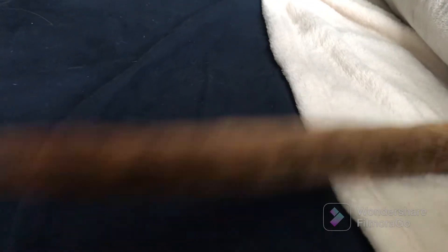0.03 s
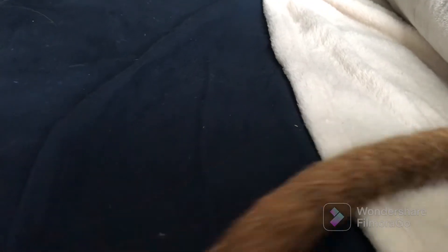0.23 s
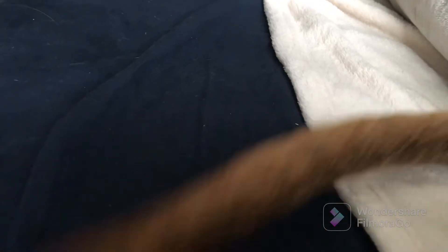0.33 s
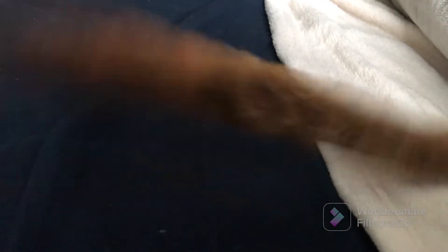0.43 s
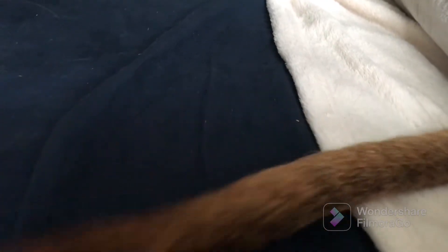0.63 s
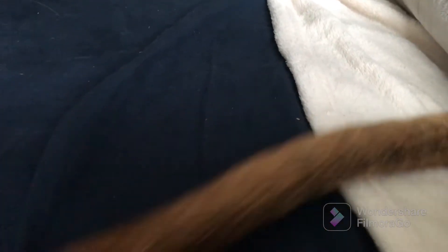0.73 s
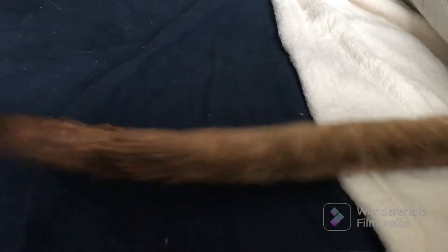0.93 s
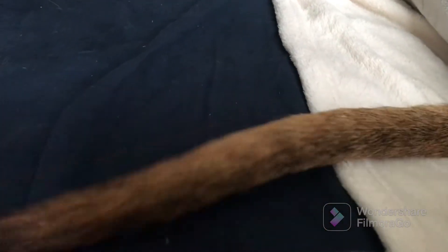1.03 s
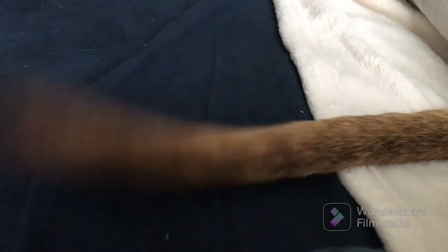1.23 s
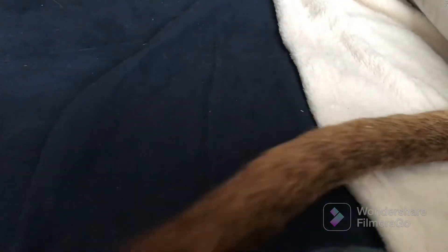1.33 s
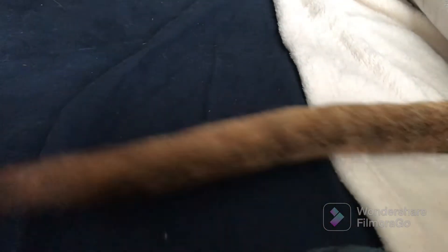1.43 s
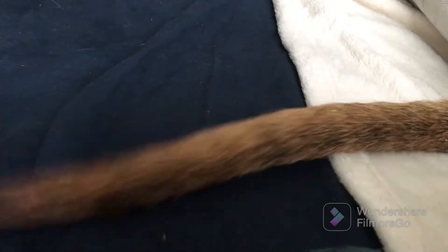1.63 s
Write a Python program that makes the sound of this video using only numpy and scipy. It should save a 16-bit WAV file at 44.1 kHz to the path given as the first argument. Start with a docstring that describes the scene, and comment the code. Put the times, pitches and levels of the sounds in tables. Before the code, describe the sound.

A dog's wagging tail lands on soft bedding in five quick, low thuds, each with a light brush of fur. The last wags only graze the cloth. The microphone is close, in a quiet room with faint hiss.

```python
"""A quiet room, the microphone close to a dog on soft bedding; low rumble and hiss lie under it all.
From 0.2 s the wagging tail lands five times, about 0.2 s apart. Each blow is a low thud that drops
in pitch as the padding gives, with a pat of the cover and a brush of fur; three also knock dully.
After the fifth blow the last wags only graze the cloth, among soft rubs and faint high squeaks."""
import sys
import numpy as np
from scipy import signal
from scipy.fft import rfft, irfft
from scipy.io import wavfile

SR = 44100
rng = np.random.default_rng(int(sys.argv[2]) if len(sys.argv) > 2 else 0)


def unload_wav(signal):
    """Save mono or channel-first audio to the path in sys.argv[1] as 16-bit WAV at rate SR, clipped to [-1, 1]."""
    wavfile.write(
        sys.argv[1],
        SR,
        np.round(np.clip(np.atleast_2d(signal).T, -1, 1) * 32767).astype(np.int16),
    )


N = 74970  # 1.7 s


def amp(db):
    return 10 ** (np.asarray(db) / 20)


def unit(x):
    """Scales to an rms of 1."""
    return x / np.sqrt(np.mean(x ** 2) + 1e-20)


def noise(points, tilt_db=0):
    """Noise with a spectrum of (Hz, dB) points, tilted by so many dB per octave."""
    octave = np.log2(np.fft.rfftfreq(N, 1 / SR) + 1)
    hz, db = np.transpose(points)
    gain = amp(np.interp(octave, np.log2(hz), db) + tilt_db * octave)
    return unit(irfft(rfft(rng.standard_normal(N)) * gain, N))


def wobble(hz):
    """Smooth random motion up to about this rate."""
    lowpass = np.exp(-(np.fft.rfftfreq(N, 1 / SR) / hz) ** 2)
    return unit(irfft(rfft(rng.standard_normal(N)) * lowpass, N))


def since(start):
    """Seconds since start, zero before it."""
    return np.maximum(np.arange(N) / SR - start, 0)


def struck(t, rise, t60):
    """Quick rise, then a decay of 60 dB in t60 seconds."""
    return (1 - np.exp(-t / rise)) * np.exp(-np.log(1000) * t / t60)


def swell(middle, half):
    """A bell-shaped rise and fall."""
    return np.exp(-.5 * ((np.arange(N) / SR - middle) / half) ** 2)


def room_tone():
    """The room behind the dog: steady low rumble and even hiss."""
    # Each row, in both: frequency in Hz, relative spectral density in dB.
    rumble = [(12, -22), (25, -41.5), (50, 0), (80, -0.5), (125, -2.5), (180, -4.5), (245, -8),
              (310, -12.5), (420, -22.5), (900, -48.5)]
    hiss = [(200, -8.5), (450, -4), (800, -0.5), (1100, -1.5), (1250, -5.5), (2000, -7), (3000, -11.5),
            (4500, -15.5), (5700, -15), (6700, -23), (9500, -24), (10400, -28.5), (11800, -25.5),
            (16000, -25)]
    return amp(-55) * noise(rumble) + amp(-63) * noise(hiss)


def faint_squeaks():
    """Thin, rough high tones of unsteady pitch and level."""
    # Each row: middle and half length in seconds, pitch in Hz, level in dB.
    squeaks = [(1.275, 0.0049, 1883, -62), (1.425, 0.033, 1980, -70.5), (1.558, 0.016, 1860, -65.5),
               (1.592, 0.01, 1880, -65), (1.696, 0.0058, 1894, -65.5)]
    jitter_share, flutter_db, wander_hz = 0.0336, 2.5, 260
    sound = np.zeros(N)
    for middle, half, hz, db in squeaks:
        pitch = hz * (1 + jitter_share * wobble(wander_hz))
        tone = np.sin(2 * np.pi * np.cumsum(pitch) / SR)
        flutter = amp(flutter_db * wobble(wander_hz))
        sound += amp(db) * swell(middle, half) * unit(flutter * tone)
    return sound


def bedding_rubs():
    """The bedding shifts with a muffled, low rustle."""
    # Each row: middle and half length in seconds, band centre in Hz, level in dB.
    rubs = [(.208, 0.0054, 350, -56.5), (0.292, 0.019, 77, -52), (0.624, .008, 207, -49),
            (1.094, 0.019, 76, -52.5), (1.16, 0.06, 174, -57), (1.402, 0.028, 310, -61)]
    width_octaves = 0.34
    sound = np.zeros(N)
    for middle, half, hz, db in rubs:
        octaves = np.log2((np.fft.rfftfreq(N, 1 / SR) + 1) / hz)
        band = np.exp(-.5 * (octaves / width_octaves) ** 2)
        rustle = unit(irfft(rfft(rng.standard_normal(N)) * band, N))
        sound += amp(db) * swell(middle, half) * rustle
    return sound


def fur_brushes():
    """Hairs sweep over the cloth in grainy swishes."""
    # Each row: middle and half length in seconds, level in dB, brightness in dB per octave.
    brushes = [(0.213, 0.012, -70, 0.5), (0.399, 0.018, -63, 0), (0.65, 0.0073, -66.5, 1),
               (0.829, 0.022, -67.5, 1.5), (1.019, 0.0093, -69.5, 3), (1.105, 0.017, -72, 3.5),
               (1.393, 0.011, -67, 7.5), (1.563, 0.028, -69.5, 2)]
    # Fur on cloth. Each row: frequency in Hz, relative spectral density in dB.
    fur_spectrum = [(500, -2.5), (1500, -1), (3500, 1.5), (5700, 0.5), (6800, -9.5), (8700, -3),
                    (10500, -12.5), (13000, -11), (16000, -22)]
    grain_db = 1.5
    sound = np.zeros(N)
    for middle, half, db, tilt_db in brushes:
        swish = noise(fur_spectrum, tilt_db) * amp(grain_db * wobble(hz=870))
        sound += amp(db) * swell(middle, half) * unit(swish)
    return sound


def thread_snaps():
    """In the hardest slap the cover's taut threads give with tiny, sharp clicks."""
    # Each row: start in seconds, level in dB.
    snaps = [(0.6358, -54), (.64, -49)]
    # The click. Each row: frequency in Hz, relative spectral density in dB.
    snap_spectrum = [(1500, -6), (5000, -3), (7000, 3), (9000, -1), (12000, -7), (16000, -5)]
    return sum(amp(db) * noise(snap_spectrum) * struck(since(start), rise=0.00008, t60=0.005)
               for start, db in snaps)


def cover_pats():
    """First contact of the tail: a short pat of the cover and a tick of fabric."""
    # Each row: start in seconds, pat level in dB, pat pitch in Hz, tick level in dB.
    pats = [(0.2074, -43.5, 910, -52), (.3988, -68, 410, -73), (.641, -32, 630, -49),
            (.8261, -43.5, 635, -66), (1.0202, -38, 470, -59)]
    # The fabric's tick. Each row: frequency in Hz, relative spectral density in dB.
    tick_spectrum = [(300, 10.5), (1200, 9), (1900, 4), (2600, 2.5), (5000, -11), (9000, -7), (16000, -11)]
    sound = np.zeros(N)
    for start, pat_db, pat_hz, tick_db in pats:
        t = since(start)
        pat = -amp(pat_db) * np.sin(2 * np.pi * pat_hz * t) * struck(t, rise=0.00049, t60=0.011)
        tick = amp(tick_db) * noise(tick_spectrum) * struck(t, rise=0.00019, t60=0.023)
        sound += pat + tick
    return sound


def tail_knocks():
    """In the harder blows the tail's firm core lands with a dull knock, dead within a few cycles."""
    # Each row: start in seconds, level in dB, pitch in Hz, ring time in seconds.
    knocks = [(0.2088, -24, 164, 0.026), (.6423, -23.1, 200, 0.029), (1.0171, -34.5, 297, 0.036)]
    sound = np.zeros(N)
    for start, db, hz, t60 in knocks:
        t = since(start)
        sound += amp(db) * np.sin(2 * np.pi * hz * t) * struck(t, rise=0.0026, t60=t60)
    return sound


def padding_thuds():
    """The padding gives under the tail: its pitch falls, it is smothered, the mattress rings briefly."""
    # Each row: start in seconds, level in dB, starting pitch in Hz, sinking time, rise and length
    # in seconds, after-ring level in dB, after-ring pitch in Hz.
    thuds = [(0.2087, -34.5, 136, 0.0054, 0.00076, 0.05, -42, 106),
             (0.3988, -38, 147, 0.0062, 0.00062, 0.03, -41, 82.7),
             (0.6403, -31, 440, 0.0029, .0017, 0.05, -34, 129.6),
             (0.825, -35.3, 215, 0.00744, 0.0071, 0.043, -52, 147),
             (1.023, -31.7, 167, 0.0042, 0.0023, 0.042, -41, 129)]
    rest_hz = 49  # pitch of the mattress once the tail has sunk in
    sound = np.zeros(N)
    for start, db, start_hz, sink, rise, length, ring_db, ring_hz in thuds:
        t = since(start)
        turns = rest_hz * t + (start_hz - rest_hz) * sink * (1 - np.exp(-t / sink))
        smother = np.exp(-(t / length) ** 3)
        thud = -amp(db) * np.sin(2 * np.pi * turns) * (1 - np.exp(-t / rise)) * smother
        ring = amp(ring_db) * np.sin(2 * np.pi * ring_hz * t) * struck(t, rise=0.006, t60=0.14)
        sound += thud + ring
    return sound


def scene():
    """One close microphone: room tone, the tail's blows and the small sounds around them."""
    room = room_tone()
    blows = padding_thuds() + tail_knocks() + cover_pats() + thread_snaps()
    small_sounds = fur_brushes() + bedding_rubs() + faint_squeaks()
    return (room + blows + small_sounds)[None]


def record(dry):
    """The recorder cuts off the highest treble."""
    edge_hz = 15850
    lowpass = signal.firwin(511, edge_hz, window=("kaiser", 9), fs=SR)
    return signal.oaconvolve(dry, lowpass[None], "same")


dry = scene()
out = record(dry)
unload_wav(out)
```